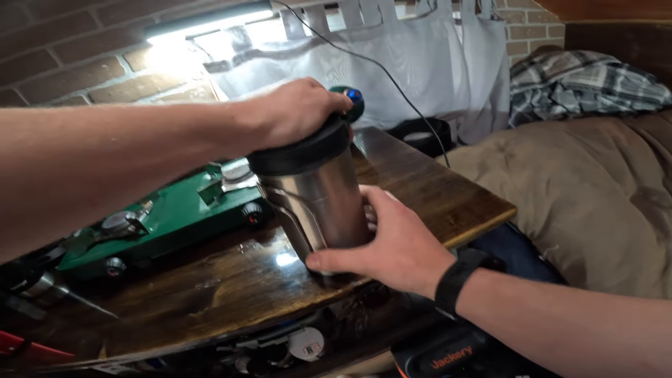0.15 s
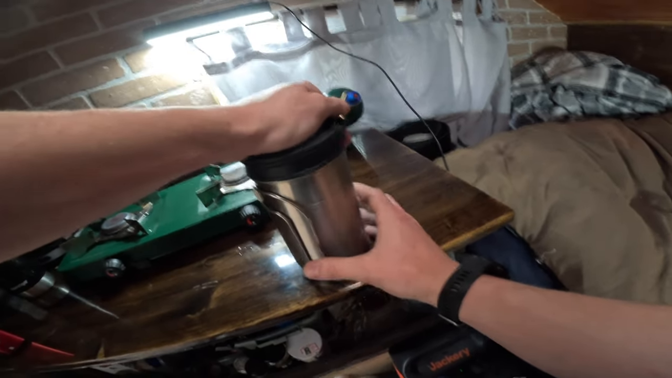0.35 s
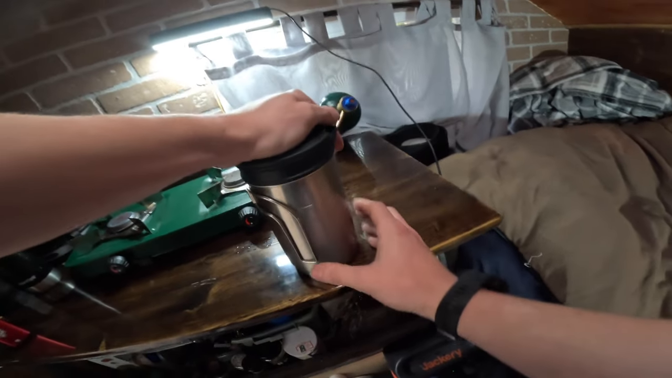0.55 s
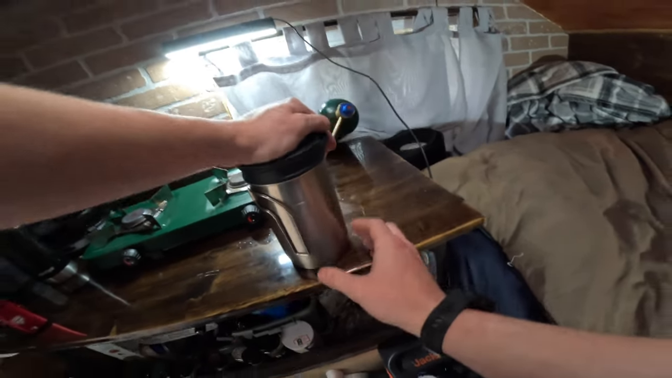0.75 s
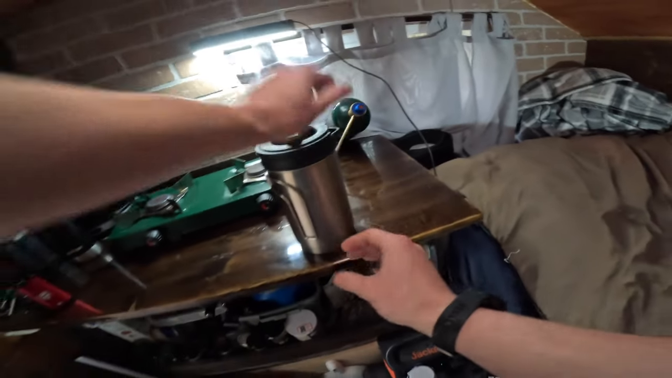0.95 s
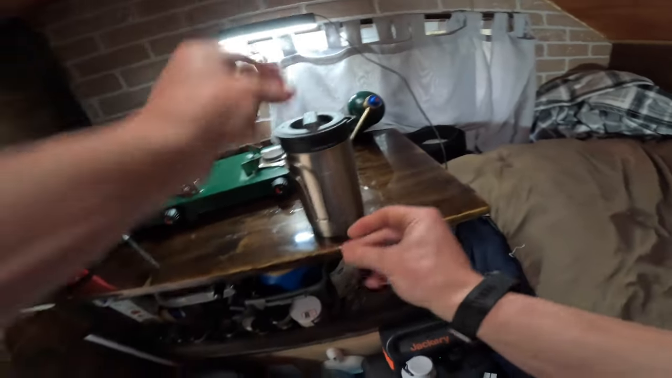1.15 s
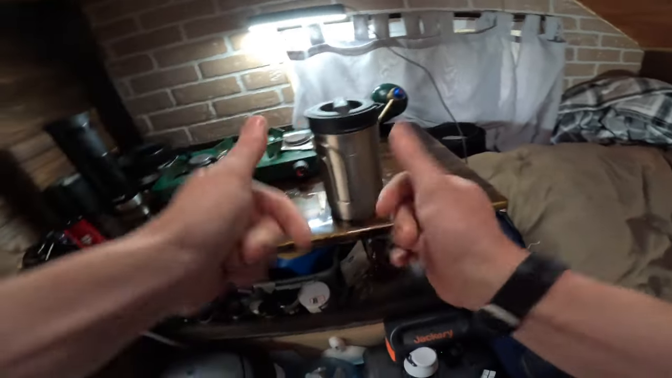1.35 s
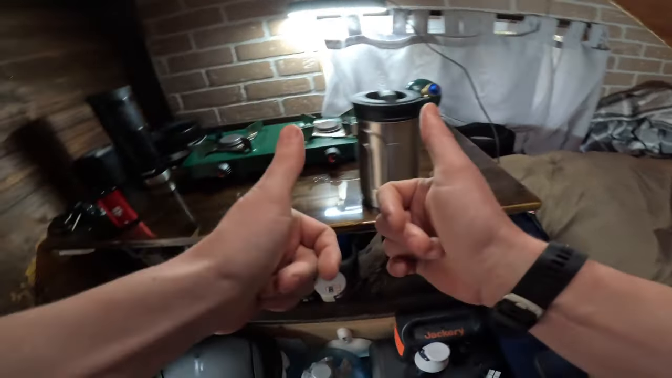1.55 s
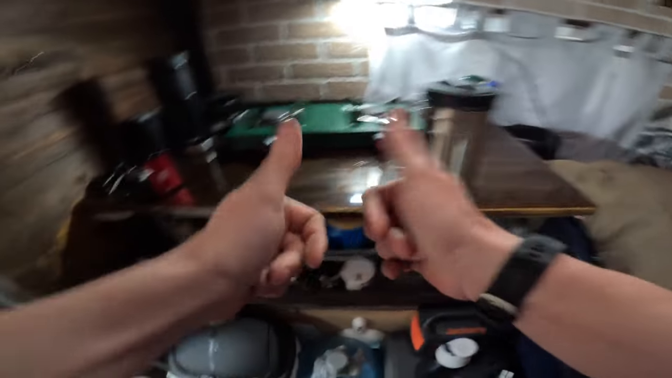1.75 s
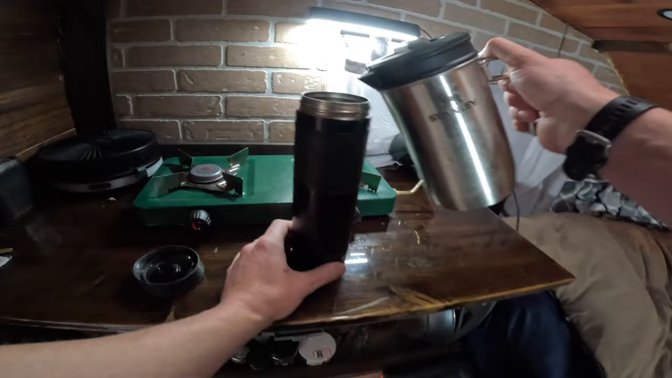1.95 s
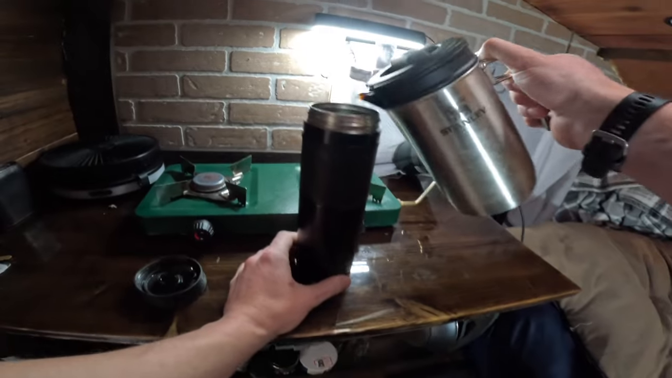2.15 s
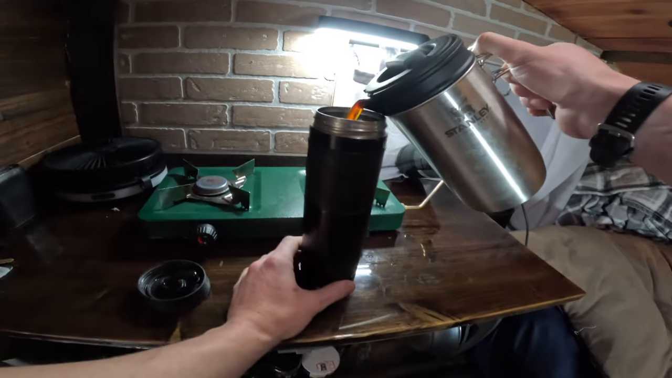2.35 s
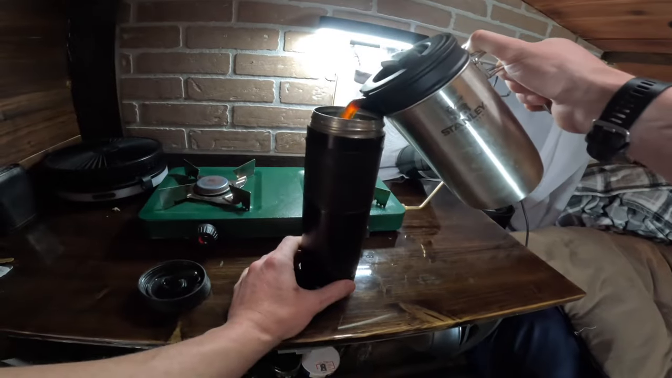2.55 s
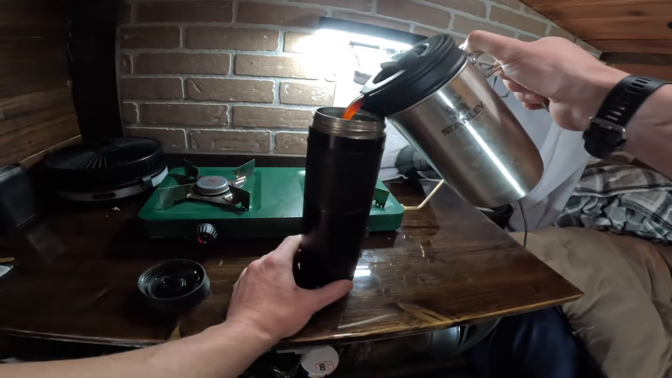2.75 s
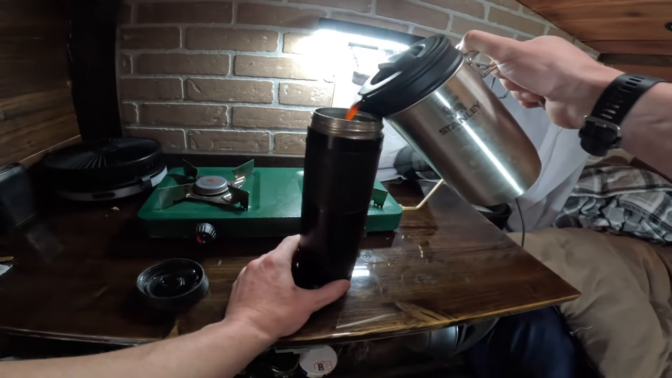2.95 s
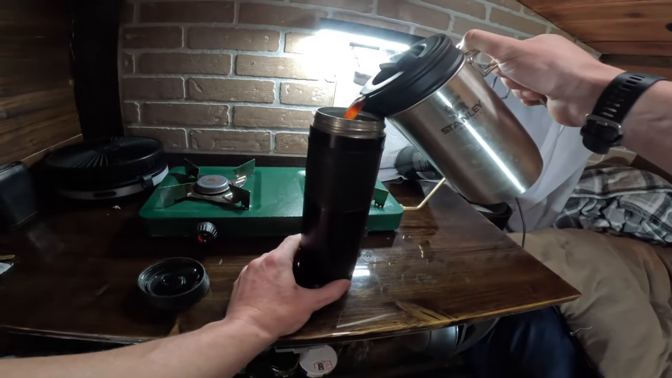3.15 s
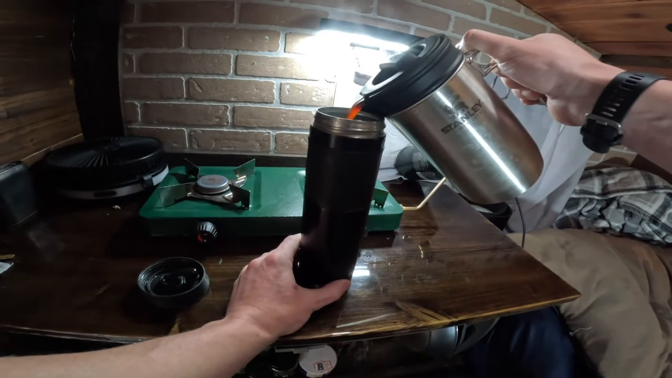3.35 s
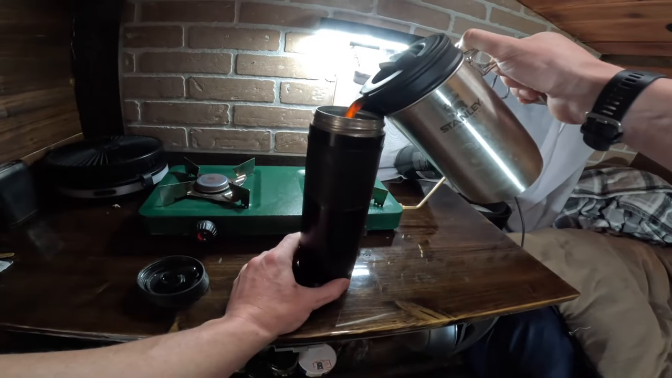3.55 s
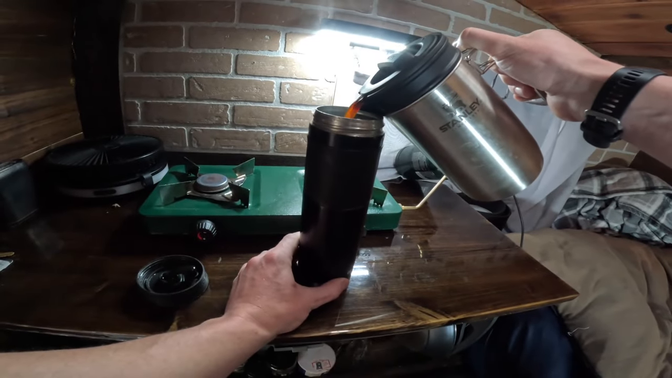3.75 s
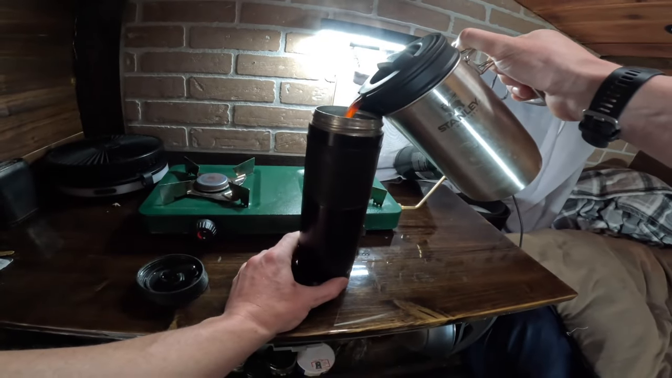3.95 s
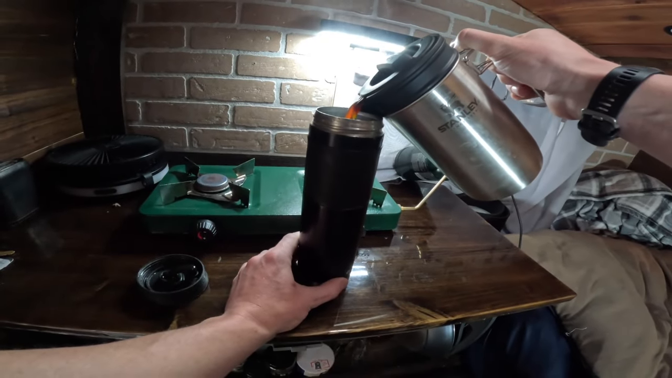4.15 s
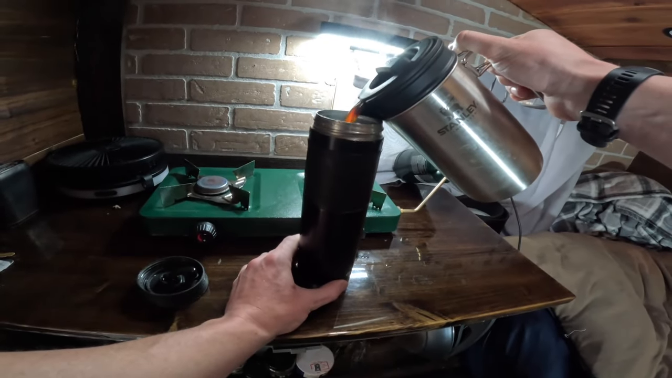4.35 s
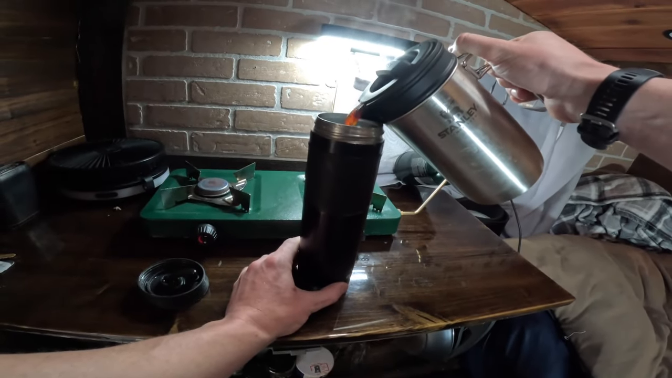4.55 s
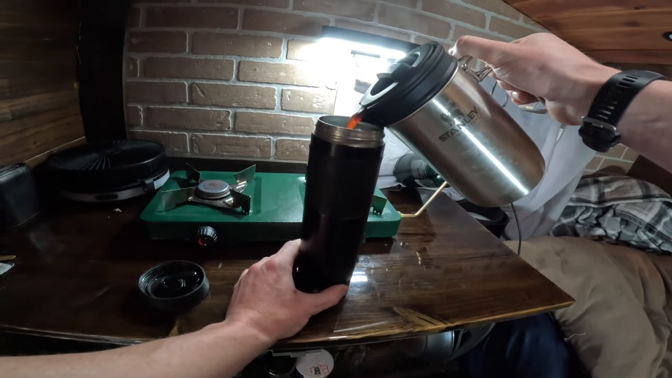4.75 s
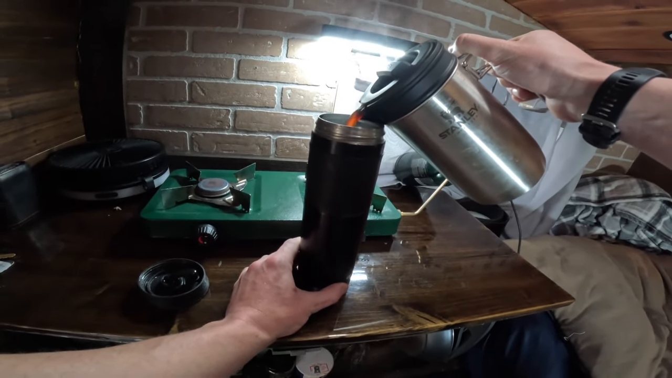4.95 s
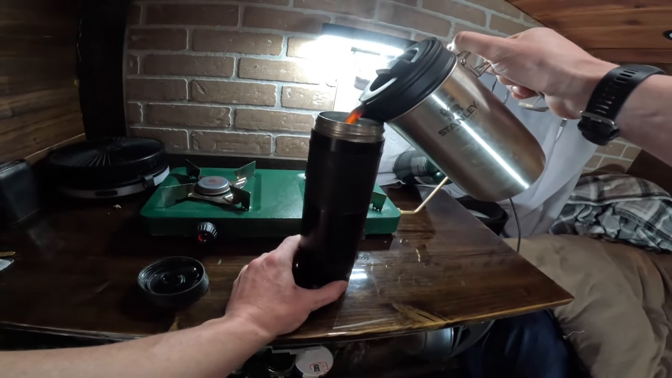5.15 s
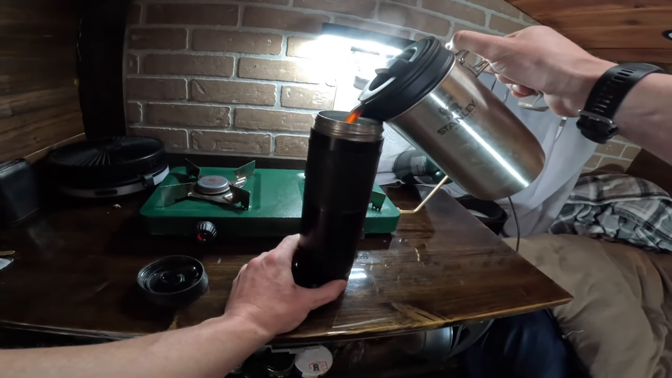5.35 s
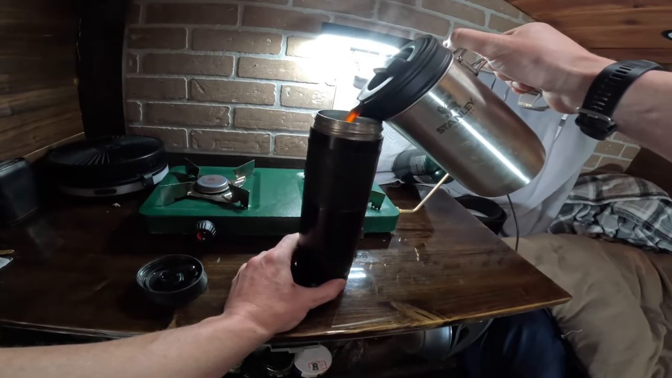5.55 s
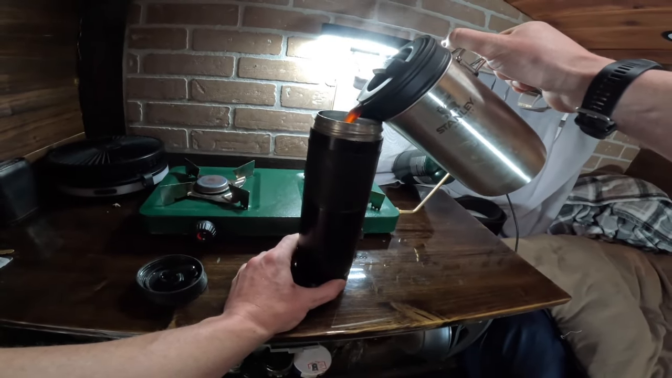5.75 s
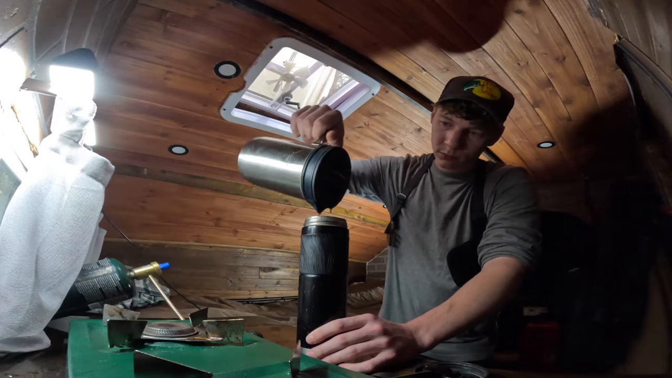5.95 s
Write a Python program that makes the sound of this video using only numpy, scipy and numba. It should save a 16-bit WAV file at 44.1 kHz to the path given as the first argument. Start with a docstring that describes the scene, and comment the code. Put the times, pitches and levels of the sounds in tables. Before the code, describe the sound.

Two sharp finger snaps break a quiet camper, then coffee splashes and gurgles into a tall steel mug, the hollow tone slowly rising.

```python
"""Coffee poured in a camper

In a small wood-lined camper a hand slides off a press pot, fingers snap twice, then coffee is poured into a tall
steel mug. Fizz, splashes and slugs of liquid excite the air column above the coffee, whose modes rise as the mug
fills; the steel wall rings briefly and the table hums. Cloth, cabin noise and low rumble lie behind."""
import sys
import numpy as np
from scipy import signal
from scipy.fft import rfft, irfft
from scipy.io import wavfile
from numba import njit

SR = 44100
rng = np.random.default_rng(int(sys.argv[2]) if len(sys.argv) > 2 else 0)


def generate_wav(signal):
    """Clip the signal to [-1, 1] and save it as 16-bit WAV at the path in sys.argv[1]."""
    frames = np.transpose(np.atleast_2d(signal))
    scaled = np.clip(frames, -1, 1) * 32767
    pcm = np.round(scaled).astype(np.int16)
    wavfile.write(sys.argv[1], SR, pcm)


N = 268260

# the stream: (time [s], fizz [dB], fine mist [dB], churn of the lowest mode [dB], slosh of a 0 dB slug [dB])
STREAM = [(2.25, -51, -55, -32, -24), (2.44, -57, -60, -56, -28), (2.61, -53, -65, -51.5, -40),
          (2.85, -43.5, -49.5, -46.5, -23), (3.02, -40, -52, -48, -46), (3.2, -44, -49, -55, -65),
          (3.53, -45.5, -60, -53, -33), (3.68, -42, -47, -37.5, -27), (3.81, -50.5, -61, -50, -10),
          (3.93, -42, -52.5, -37.5, -21.5), (4.4, -44, -47.5, -34, -40), (4.93, -48.5, -56.5, -35, -49),
          (5.6, -47, -52.5, -37, -45), (5.66, -53, -66, -32.5, -43), (5.89, -44.5, -47, -34.5, -31),
          (6.08, -53, -56, -43, -44)]
# air column: (multiple of the second mode, t60 [s], level [dB])
COLUMN_MODES = [(1.001, 0.045, -32.5), (1.67, 0.069, -34), (2.33, 0.052, -38.5), (3.05, 0.054, -52),
                (3.9, 0.017, -41)]
LOWEST_SHARE, LOWEST_T60_S = 0.318, 0.11  # lowest mode as a share of the second
# the mug fills ever more slowly as the pot empties, and the air column shortens
EMPTY_COLUMN_M, FULL_RISE_M = 0.233, 0.0784
FILLS_FROM_S, POT_DRAINS_S = 2.887, 3.56

# the louder splashes: (time [s], level [dB], biggest bubble [Hz], spray [dB], t60 before limits [s])
SPLASHES = [(2.3034, -20.5, 1154, -56, 0.074), (2.3036, -17, 2770, -32, 0.058),
            (2.4305, -17.5, 2710, -31.5, 0.069), (2.4617, -19, 2620, -33.5, 0.039),
            (2.5432, -28.5, 3460, -62, 0.098), (2.5436, -31, 4020, -52, 0.042),
            (2.5926, -28, 3376, -53, 0.16), (2.628, -30.5, 3840, -48, 0.24),
            (2.652, -29.5, 2130, -45, 0.063), (2.653, -29.5, 6460, -44, 0.22),
            (2.687, -31, 2580, -48, 0.16), (2.69, -31, 4730, -49, 0.17), (2.702, -27.5, 1820, -39.5, 0.15),
            (2.7317, -11.5, 1690, -53, 0.094), (2.7319, -11, 1778, -50, 0.079),
            (2.732, -20.5, 3450, -48, 0.031), (2.7725, -22.5, 3060, -39, 0.17),
            (2.7961, -22.5, 990, -44, 0.065), (2.8455, -20, 1540, -63, 0.028),
            (2.846, -20, 1170, -62, 0.041), (2.8708, -17, 1740, -33.5, 0.097),
            (2.871, -20, 3243, -42, 0.084), (2.874, -19.5, 1173, -47, 0.071),
            (2.978, -16.5, 3600, -32, 0.042), (2.9834, -14, 1114, -59, 0.065),
            (3.0638, -17.5, 1802, -58, 0.037), (3.092, -20, 2680, -26, 0.042),
            (3.106, -24, 2760, -38, 0.018), (3.1394, -20.5, 1163, -33, .039),
            (3.1647, -29.5, 1120, -66, 0.14), (3.166, -19.5, 2740, -40, 0.048),
            (3.185, -26, 3940, -57, 0.022), (3.3973, -35, 2835, -64, 0.2), (3.5932, -26, 1790, -38.5, 0.18),
            (3.6609, -23.5, 2760, -32, 0.068), (3.701, -18.5, 4080, -27, 0.029),
            (3.754, -28, 2280, -49, 0.032), (3.782, -29.5, 2080, -40, 0.034),
            (3.8655, -26.5, 1145, -32, 0.17), (3.9177, -22.5, 2940, -52, 0.029),
            (3.951, -16.5, 1264, -38, 0.19), (4.0153, -24, 1230, -59, .043),
            (4.0358, -21.5, 1880, -41, 0.079), (4.118, -23, 1200, -38, 0.032),
            (4.119, -29, 1990, -32.5, 0.054), (4.172, -16.5, 3830, -30, 0.033),
            (4.2099, -19.5, 2840, -68, 0.032), (4.2366, -23.5, 1220, -23, 0.025),
            (4.2629, -28, 3020, -18, 0.03), (4.2923, -24, 1910, -79, 0.057),
            (4.338, -20.5, 2700, -35, 0.032), (4.406, -24.5, 3090, -42, 0.15),
            (4.4484, -22.5, 2820, -36, 0.18), (4.4599, -18, 2860, -48, 0.038),
            (4.5123, -26, 2280, -53, 0.034), (4.688, -27, 3100, -68, 0.037), (4.705, -17, 2860, -58, 0.026),
            (4.7592, -16, 1306, -58, 0.037), (4.7897, -20, 2070, -37.5, 0.05),
            (4.853, -23.5, 1320, -40, 0.054), (4.9561, -26.5, 1480, -32, 0.039),
            (4.9947, -14.5, 2720, -50, 0.033), (5.0261, -18.5, 2240, -47, 0.023),
            (5.088, -27, 2200, -30, 0.033), (5.097, -17, 2130, -39, 0.045), (5.1293, -19, 1415, -59, 0.035),
            (5.1703, -24, 2350, -51, 0.046), (5.192, -20.5, 3220, -32, 0.064),
            (5.2057, -17.5, 2240, -49, 0.053), (5.227, -21, 1340, -36, .056),
            (5.279, -22, 3120, -33, 0.021), (5.306, -12.5, 3100, -60, 0.031),
            (5.43, -25.5, 3290, -54, 0.059), (5.461, -27, 1330, -33.5, .06),
            (5.4763, -26, 1400, -36, 0.057), (5.512, -22, 3300, -30, 0.016), (5.552, -26, 3510, -56, 0.041),
            (5.6023, -17, 2130, -31.5, 0.027), (5.6283, -16.5, 1380, -46, 0.071),
            (5.63, -17, 2190, -75, 0.027), (5.6797, -26, 3200, -64, 0.17),
            (5.7008, -24.5, 1400, -34, 0.042), (5.7749, -29, 1550, -63, 0.08),
            (5.8035, -19, 1490, -51, 0.047), (5.8294, -22, 1500, -60, .048),
            (5.9022, -25, 3200, -38, 0.057), (6.048, -25, 1460, -44, 0.057)]
POUR_START_S = SPLASHES[0][0]
# lesser splashes at random times; up to 6 dB is added to both levels
SMALL_COUNT, SMALL_FROM_S, SMALL_T60_S = 70, 2.65, 0.043
SMALL_DB, SMALL_SPRAY_DB, SMALL_LOW_HZ, SMALL_HIGH_HZ = -37, -45.5, 1104, 3200
CLEAN_PER_DB, FOAMS_OVER_S = 0.021, 2.8
BUBBLE_BLUR = 0.045  # the torn bubble wall blurs its pitch by this share
# colour of the fine splash: (frequency [Hz], relative level [dB])
SPLASH_COLOUR = [(290, -4), (500, -7), (590, 2), (937, -4), (1280, 13.5), (1760, -16), (2920, 10.5),
                 (6870, -4.5), (9000, -22), (15000, -41)]

# slugs of coffee landing: (time [s], level [dB], t60 before limits [s])
SLUGS = [(2.311, -23.5, 0.093), (2.415, -28, 0.29), (2.449, -20.5, 0.12), (2.87, -19.5, 0.087),
         (3.064, -33.5, 0.13), (3.167, -37, 0.29), (3.244, -30.5, 0.15), (3.514, -32.5, 0.45),
         (3.577, -25.5, 0.13), (3.616, -26, 0.2), (3.867, -19.5, 0.12), (3.952, -15, 0.29),
         (4.053, -30, 0.42), (4.123, -23.5, 0.42), (4.143, -17, 0.062), (4.192, -12, 0.12),
         (4.232, -19, 0.33), (4.267, -17.5, 0.14), (4.32, -16, 0.051), (4.358, -6, 0.056),
         (4.417, -13.5, 0.045), (4.461, -11, 0.18), (4.53, -8, 0.077), (4.607, -20, 0.3),
         (4.691, -15.5, 0.22), (4.706, -12.5, 0.084), (4.731, -21.5, 0.092), (4.79, -15.5, 0.12),
         (4.805, -12, 0.14), (4.944, -18, 0.16), (4.996, -13, 0.17), (5.018, -10.5, 0.12),
         (5.088, -14.5, 0.04), (5.126, -13.5, 0.059), (5.191, -9, 0.14), (5.227, -11.5, 0.17),
         (5.3, -18.5, 0.094), (5.388, -10.5, 0.082), (5.429, -5, 0.1), (5.458, -14.5, 0.17),
         (5.477, -9.5, 0.11), (5.513, -14.5, 0.094), (5.541, -13.5, 0.13), (5.55, -10, 0.075),
         (5.635, -14, 0.04), (5.701, -15, 0.1), (5.781, -17.5, 0.099), (5.826, -15, 0.055),
         (5.916, -14.5, 0.13), (6.022, -32, 0.22), (6.047, -19.5, 0.046)]
SLUG_ROUNDING, SLUG_SAG = 1.15, -0.036  # hold before the fall, drop in pitch
STILLED_S = 0.0016  # time constant with which the next slug stills the ring
SLOSH_FOLLOWS = 0.4  # share of a slug's dB that its slosh follows

# steel wall: (frequency [Hz], t60 [s], level [dB])
WALL_MODES = [(1950, 0.2, -47), (2200, 0.15, -55), (2740, 0.05, -52), (3036, 0.2, -54), (4630, 0.05, -48),
              (6500, 0.12, -46), (6650, 0.2, -42), (6780, 0.12, -47)]
WALL_DAMPING_DB_PER_S = 23
# the table under the mug: (time [s], level [dB])
TABLE_LEVEL = [(2.25, -56.5), (2.44, -42.5), (2.8, -79), (2.88, -43.5), (3.02, -79), (3.53, -95),
               (3.68, -52.5), (3.81, -74), (3.91, -46.5), (4.03, -61.5), (4.4, -55), (4.93, -75),
               (5.02, -47.5), (5.12, -58.5), (5.6, -48.5), (5.66, -67), (5.89, -46.5), (6.08, -58.5)]
TABLE_HZ, TABLE_T60_S = 118.5, 0.31

# finger snaps: (time [s], ring [dB], palm resonance [Hz], t60 [s], crack [dB], palm thud [dB], finger slip [dB])
FINGER_SNAPS = [(1.2972, -6.5, 2170, 0.0077, -0.5, -9.5, -29), (1.3376, -7, 2470, 0.0075, -1, -11, -34.5)]
# a finger squeaks off the lid: (frequency [Hz], level [dB])
SQUEAK_PARTIALS = [(1310, -37), (1510, -41), (1860, -46), (2050, -49)]
SQUEAK_S, SQUEAK_T60_S = 0.851, 0.037
# hand thumps, skin and strap ticks: (time [s], level [dB], centre [Hz], t60 [s], width [share of centre])
HAND_TICKS = [(0.539, -34, 269, 0.31, 0.083), (.562, -34.5, 446, 0.12, 0.12),
              (0.589, -32.5, 450, 0.084, 0.21), (1.006, -41, 2600, 0.035, 0.41),
              (1.704, -56, 6600, .03, 0.092), (1.861, -29, 1480, 0.024, 0.37),
              (1.864, -34, 980, 0.046, 0.06), (1.865, -30.5, 333, 0.16, 0.43)]

# cabin noise with hands and cloth moving: (time [s], low rustle [dB], bright rustle [dB])
RUSTLE_LEVELS = [(0.0, -54, -65.5), (0.328, -47, -62), (0.48, -52.5, -62.5), (0.572, -45.5, -53.5),
                 (0.686, -51, -65), (0.78, -53.5, -63.5), (0.866, -50.5, -56.5), (1.0, -47.5, -55.5),
                 (1.206, -48.5, -62.5), (1.4, -49.5, -60), (1.698, -54, -63.5), (1.878, -41, -55.5),
                 (1.914, -42.5, -58), (2.112, -55, -65), (2.29, -52, -58.5)]
# colour of the dull noise: (frequency [Hz], relative level [dB])
LOW_COLOUR = [(15, -44), (25, -20.5), (139, -10.5), (270, 1), (321, -5.5), (381, -1.5), (555, -7),
              (928, -19), (1290, -21), (1500, -42.5), (1950, -64), (3300, -120)]
# colour of the cloth and skin: (frequency [Hz], relative level [dB])
BRIGHT_COLOUR = [(530, -62), (900, -16.5), (1300, -9), (1420, -10.5), (3040, -19.5), (7000, -32),
                 (12000, -35)]
# body movement against the microphone: (time [s], level [dB])
RUMBLE_LEVEL = [(0.0, -94), (0.05, -76), (0.29, -87), (0.44, -48), (0.48, -72), (0.83, -59), (0.9, -46),
                (1.22, -75), (1.34, -61), (1.48, -104), (1.83, -51.5), (2.2, -101.5), (2.31, -52),
                (2.37, -66), (2.46, -37), (2.76, -71), (2.9, -62), (3.0, -77)]
CABIN_T60_S, CABIN_DB = 0.08, -9

# side against mid: (frequency [Hz], level [dB])
SIDE_COLOUR = [(25, -18), (110, -43), (200, -34.5), (380, -73.5), (700, -49), (1290, -53), (2380, -52),
               (4400, -39), (8120, -30), (15000, -1.5)]
# overall tone, less bass, dips in the high treble, almost nothing above 14 kHz: (frequency [Hz], gain [dB])
TONE_GAIN = [(20, -18), (60, -7), (5000, 3.5), (7000, 0.5), (8400, -8.5), (9100, -16), (9700, -7),
             (10900, 0), (11600, -18), (12100, -17), (12500, -28), (13300, -11.5), (13900, -45.5),
             (15500, -45.5)]
OVERLOAD = 0.85  # amplitude that rounded peaks approach
CUTOFF_HZ = 15600


def pour():
    """The liquid is heard directly and through the air column, the steel wall and the table."""
    second_hz = column_hz()
    fizz_db, mist_db, churn_db, slosh_db = in_time(STREAM)
    since = np.arange(N) / SR - POUR_START_S
    pouring = since > 0
    froth = fizz(fizz_db, mist_db) * pouring
    hits = splashes()
    surface = froth + hits
    inside = froth + amp(-9) * hits  # the froth at the bottom drives the column most
    column = air_column(inside, second_hz)
    wall = steel_wall(surface, since)
    slugs = gulps(LOWEST_SHARE * second_hz, churn_db, slosh_db)
    hum = table(*in_time(TABLE_LEVEL))
    return amp(-0.5) * surface + column + wall + (slugs + hum) * pouring


def column_hz():
    """Second mode of a pipe closed by the coffee; the heaving surface makes its pitch waver."""
    filling = np.maximum(np.arange(N) / SR - FILLS_FROM_S, 0)
    length = EMPTY_COLUMN_M - FULL_RISE_M * (1 - np.exp(-filling / POT_DRAINS_S))
    second_hz = 3 * 343 / 4 / length  # three quarter waves, sound at 343 m/s
    return second_hz * (1 + 0.016 * drift(18.0))


def air_column(inside, second_hz):
    """The modes above the lowest ring with alternating sign and follow the shrinking column."""
    out = np.zeros(N)
    for k, (share, t60, db) in enumerate(COLUMN_MODES):
        out += amp(db) * (-1) ** k * mode(inside, share * second_hz, t60)
    return out


def gulps(lowest_hz, churn_db, slosh_db):
    """Slugs of coffee pump the lowest mode, each stilling the last, with neighbouring notes and a slosh."""
    churn = mode(grains(per_s=250, spread_db=3.5, clumps_db=3.2 * drift(25)), lowest_hz, LOWEST_T60_S)
    out = amp(churn_db) * rms_one(churn)
    slugs = np.zeros(N)
    next_times = [row[0] for row in SLUGS[1:]] + [N / SR]
    for (s, db, t60), next_s in zip(SLUGS, next_times):
        i = round(s * SR)
        t60 = np.clip(t60, 0.03, 0.25)
        hz = lowest_hz[i] * (1.01 + 0.015 * rng.standard_normal())
        note = blip(hz, t60, attack=0.0018, rise=SLUG_SAG, rounding=SLUG_ROUNDING)
        late = np.maximum(np.arange(len(note)) / SR - (next_s - s), 0)
        add(slugs, s, amp(db - 1.5) * note * np.exp(-late / STILLED_S))
        upper_hz = 520.0 * (1 + 0.049 * rng.standard_normal())
        lower_hz = 308 * (1 + 0.0445 * rng.standard_normal())
        add(slugs, s, amp(db - 16) * blip(upper_hz, 1.81 * t60, attack=0.011))
        add(slugs, s, amp(db - 13.5) * blip(lower_hz, 1.29 * t60, attack=0.017))
        add(out, s, amp(db - 21) * burst(390, t60, attack=0.0052, width=0.66))
        slosh = burst(576, t60, attack=0.0066, width=0.25)
        add(out, s, amp(slosh_db[i] + SLOSH_FOLLOWS * db) * slosh)
    low_cut = signal.butter(2, 170, "high", fs=SR, output="sos")
    return signal.sosfilt(low_cut, out + slugs * amp(1.75 * drift(46.0)))


def splashes():
    """Each splash is a rough burst, its biggest bubble beating with a neighbour, a swarm and a bright spray."""
    out = np.zeros(N)
    when, size, strength = rng.random((SMALL_COUNT, 3)).T
    small = np.transpose([
        SMALL_FROM_S + when * (N / SR - SMALL_FROM_S - 0.01),
        SMALL_DB + 6 * strength,
        SMALL_LOW_HZ * (SMALL_HIGH_HZ / SMALL_LOW_HZ) ** size,
        SMALL_SPRAY_DB + 6 * strength,
        np.full(SMALL_COUNT, SMALL_T60_S)])
    for s, db, hz, spray_db, t60 in [*SPLASHES, *small]:
        # the less a splash sprays, the cleaner its bubble; foam blurs it as the pour goes on
        foam = np.exp((POUR_START_S - s) / FOAMS_OVER_S)
        clean = np.clip(CLEAN_PER_DB * (db - spray_db) * foam, 0, 1)
        rough = 1 - clean
        t60 = np.clip(t60, 0.012, 0.14)
        neighbour_hz = hz * (1 + 0.06 * rng.standard_normal())
        add(out, s, amp(db + 3.0) * clean * blip(hz, 0.79 * t60, attack=0.00034, rise=0.05))
        add(out, s, amp(db - 8) * clean * burst(hz, t60, attack=0.00055, width=BUBBLE_BLUR))
        add(out, s, amp(db - 25.0) * clean * blip(neighbour_hz, t60, attack=0.0025))
        add(out, s, amp(db - 12.5) * rough * burst(hz, t60, attack=0.00026, width=0.72))
        add(out, s, amp(db - 7) * rough * swarm(hz, t60, count=9))
        add(out, s, amp(spray_db) * burst(3300, 0.71 * t60, attack=0.0013, width=2.7))
    return out


def swarm(hz, t60, count):
    """A handful of mostly smaller, higher bubbles, born within a few hundredths of a second."""
    out = np.zeros(SR // 5)
    for wait, size, strength in rng.standard_normal((count, 3)):
        pitch = hz * np.exp(0.342 * abs(size) - 0.12)
        note = amp(0.23 * strength) * blip(pitch, 28.0 / pitch, attack=0.0011, rise=0.051)
        add(out, 0.13 * t60 * min(abs(wait), 3), note)
    return out


def fizz(level_db, mist_db):
    """Small bubbles and fewer large ones ring over splash and mist; all come in the same spurts."""
    spurts = drift(22)
    small_clicks = grains(per_s=1300, spread_db=5.0, clumps_db=5.0 * spurts)
    large_clicks = grains(per_s=450, spread_db=4.0, clumps_db=4.5 * spurts)
    small = bubbles(small_clicks, 1482, 6720, cycles=26.0, swell_cycles=8.8)
    large = bubbles(large_clicks, 766.0, 3680, cycles=56.0, swell_cycles=5.8)
    drops = grains(per_s=5000, spread_db=4.0, clumps_db=4.0 * spurts)
    splash = rms_one(colour(drops, SPLASH_COLOUR))
    mist = signal.sosfilt(signal.butter(2, 5000, "high", fs=SR, output="sos"), drops)
    body = amp(-2.0) * small + amp(-7.0) * large + amp(-2.0) * splash
    return (amp(level_db) * rms_one(body) + amp(mist_db) * rms_one(mist)) * amp(2.2 * spurts)


def bubbles(clicks, low_hz, high_hz, cycles, swell_cycles):
    """Clicks dealt to many pitches; each swells for a few cycles, then rings out."""
    dealt = rng.integers(0, 20, N)
    out = np.zeros(N)
    for k, hz in enumerate(np.geomspace(low_hz, high_hz, 20)):
        swell = mode(clicks * (dealt == k), hz, swell_cycles / hz)
        out += hz * mode(swell, hz, cycles / hz)  # the factor hz evens out the longer low rings
    return rms_one(out)


def steel_wall(surface, since):
    """High modes of the steel flicker in level; the wetted wall soon stops ringing."""
    dry_wall = surface * amp(-WALL_DAMPING_DB_PER_S * np.maximum(since, 0))
    out = np.zeros(N)
    for hz, t60, db in WALL_MODES:
        out += amp(db + 5.0 * drift(39)) * mode(dry_wall, hz, t60)
    return out


def table(level_db):
    """The table top hums at its lowest mode and rumbles broadly around it."""
    hum = rms_one(mode(rng.standard_normal(N), TABLE_HZ, TABLE_T60_S))
    band = signal.butter(2, [85, 260], "band", fs=SR, output="sos")
    broad = rms_one(signal.sosfilt(band, rng.standard_normal(N)))
    return amp(level_db) * (1.27 * hum + amp(3) * broad)


def snaps():
    """The finger slips off the thumb, cracks on the palm and sets its hollow ringing."""
    out = np.zeros(N)
    for s, db, hz, t60, crack_db, thud_db, slip_db in FINGER_SNAPS:
        add(out, s - 0.013, amp(slip_db) * burst(7700, 0.054, attack=0.0044, width=0.84))
        add(out, s, amp(db) * blip(hz, t60, attack=0.00031, rounding=1.42))
        crack = clap(500, 7000)
        crack += 0.19 * burst(2800, 0.0081, attack=0.00026, width=0.93)
        crack += 0.13 * burst(1400, 0.0074, attack=0.0003, width=1.0)
        add(out, s + 0.00031, amp(crack_db) * crack)
        add(out, s, amp(thud_db) * blip(405, 0.011, attack=0.00028))
        add(out, s, amp(thud_db - 23.0) * blip(166, 0.089, attack=0.0049))
    return out


def clap(low_hz, high_hz):
    """One sudden drop of pressure, even across a broad band; height 1."""
    impulse = np.arange(round(0.2 * SR)) == 0
    click = signal.lfilter(*signal.butter(1, [low_hz, high_hz], "band", fs=SR), impulse)
    return -click / click.max()


def handling():
    """A finger squeaks off the lid in damped partials; thumps and ticks are short puffs of noise."""
    out = np.zeros(N)
    for hz, db in SQUEAK_PARTIALS:
        add(out, SQUEAK_S, amp(db) * blip(hz, SQUEAK_T60_S, attack=0.003, rounding=1.56))
    for s, db, hz, t60, width in HAND_TICKS:
        add(out, s, amp(db) * burst(hz, t60, attack=0.0023, width=abs(width)))
    return out


def rustle():
    """Dull cabin noise and a brighter, grainy scrape of cloth and skin."""
    low_db, bright_db = in_time(RUSTLE_LEVELS)
    low = rms_one(colour(rng.standard_normal(N), LOW_COLOUR))
    scrape = grains(per_s=6000, spread_db=0.5, clumps_db=1.7 * drift(36))
    bright = rms_one(colour(scrape, BRIGHT_COLOUR))
    return amp(low_db + 1.54 * drift(30)) * low + amp(bright_db + 0.9 * drift(30)) * bright


def rumble():
    """Lumpy low noise from body movement against the microphone, up to the last point of its table."""
    (level_db,) = in_time(RUMBLE_LEVEL)
    band = signal.butter(2, [25, 100], "band", fs=SR, output="sos")
    low_noise = rms_one(signal.sosfilt(band, rng.standard_normal(N)))
    return amp(level_db) * low_noise * (np.arange(N) < RUMBLE_LEVEL[-1][0] * SR)


def cabin(x):
    """Dense reflections that die fast among wood and bedding."""
    t = np.arange(round(0.3 * SR)) / SR
    tail = rng.standard_normal(len(t)) * amp(-60 * t / CABIN_T60_S) * (t > 0.002)
    return signal.fftconvolve(x, tail / np.sqrt(np.sum(tail ** 2)))[:N]


def blip(hz, t60, attack, rise=0.0, rounding=1):
    """A damped note with a short attack and a gliding pitch; rounding over 1 holds it before it falls."""
    t = np.arange(round(t60 * SR)) / SR
    tone = np.sin(2 * np.pi * hz * t * (1 + rise * t / t60))
    return tone * (1 - np.exp(-t / attack)) * amp(-60 * (t / t60) ** rounding)


def burst(hz, t60, attack, width):
    """A puff of noise through a resonance (width as a share of its pitch)."""
    t = np.arange(round(0.2 * SR)) / SR
    edges = np.clip([hz / (1 + width), hz * (1 + width)], 30, 0.45 * SR)
    noise = signal.lfilter(*signal.butter(2, edges, "band", fs=SR), rng.standard_normal(len(t)))
    return rms_one(noise) * (1 - np.exp(-t / attack)) * amp(-60 * t / t60)


def grains(per_s, spread_db, clumps_db):
    """Random clicks of uneven size whose rate follows the clumps."""
    sizes = amp(spread_db * np.minimum(rng.exponential(1, N), 5)) * rng.choice([-1, 1], N)
    return sizes * (rng.random(N) < per_s * amp(clumps_db) / SR)


@njit
def ring(clicks, w, r):
    """A two-pole resonance whose pitch may move; a unit click rings at about height 1."""
    out = np.zeros(len(clicks))
    for i in range(2, len(clicks)):
        out[i] = 2 * r * np.cos(w[i]) * out[i - 1] - r * r * out[i - 2] + np.sin(w[i]) * clicks[i - 1]
    return out


def mode(clicks, hz, t60):
    """One mode of fixed or moving pitch."""
    return ring(clicks, np.full(N, 2 * np.pi / SR) * hz, amp(-60 / (t60 * SR)))


def drift(rate):
    """Slow random wander of rms 1, its speed set by a corner frequency in Hz."""
    r = np.exp(-2 * np.pi * rate / SR)
    wander = signal.lfilter([1], [1, -2 * r, r * r], rng.standard_normal(N + SR))
    return rms_one(wander[SR:])  # the first second lets the filter settle


def colour(x, points):
    """Causal filter with the given dB shape (minimum phase from the folded cepstrum)."""
    hz, db = np.transpose(points)
    grid = np.maximum(np.arange(2049) * SR / 4096, 1)
    cepstrum = irfft(np.interp(np.log(grid), np.log(hz), db) * np.log(10) / 20)
    cepstrum[1:2048] *= 2
    cepstrum[2049:] = 0
    return signal.fftconvolve(x, irfft(np.exp(rfft(cepstrum))))[:N]


def in_time(rows):
    """Each column of a table as a curve over all samples."""
    s, *columns = np.transpose(rows)
    return [np.interp(np.arange(N) / SR, s, c) for c in columns]


def add(out, s, sound):
    """Mixes a sound in at s seconds."""
    i = round(s * SR)
    out[i:i + len(sound)] += sound[:len(out) - i]


def amp(db):
    """Decibels to gain."""
    return 10 ** (np.asarray(db) / 20)


def rms_one(x):
    """Scaled to rms 1."""
    return x / np.sqrt(np.mean(x ** 2) + 1e-20)


def scene():
    """Close ports hear nearly the same; a faint flickering part is opposite in the two, most in the treble."""
    near = pour() + snaps() + handling()
    mid = near + amp(CABIN_DB) * cabin(near) + rustle() + rumble()
    side = colour(mid * drift(16.5), SIDE_COLOUR)
    return np.array([mid + side, mid - side])


def record(dry):
    """The overall tone has less bass and dips in the high treble, the loudest peaks are rounded, the top is cut."""
    heard = np.array([colour(c, TONE_GAIN) for c in dry])
    over = heard / OVERLOAD
    rounded = heard / (1 + over ** 4) ** 0.25
    top_cut = signal.cheby2(12, 70, CUTOFF_HZ, fs=SR, output="sos")
    return signal.sosfilt(top_cut, rounded)


dry = scene()
out = record(dry)
generate_wav(out)
```